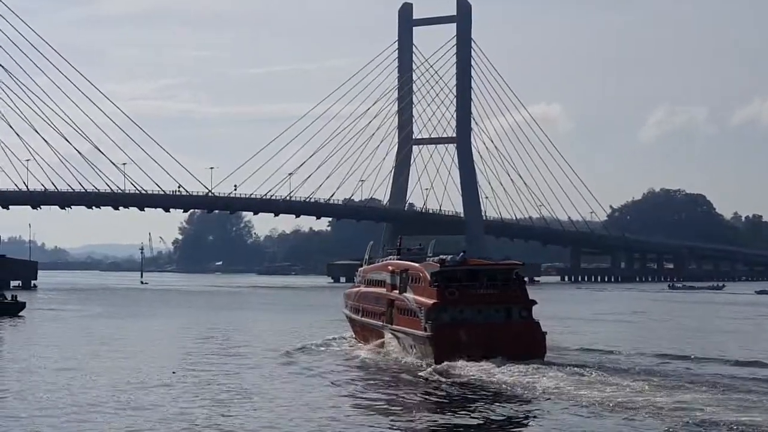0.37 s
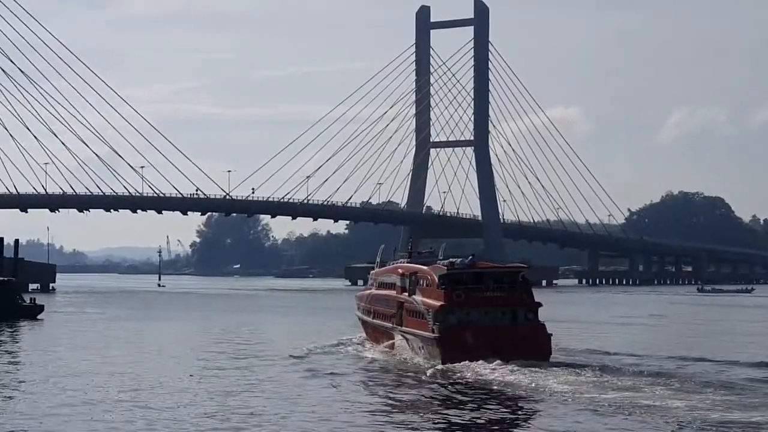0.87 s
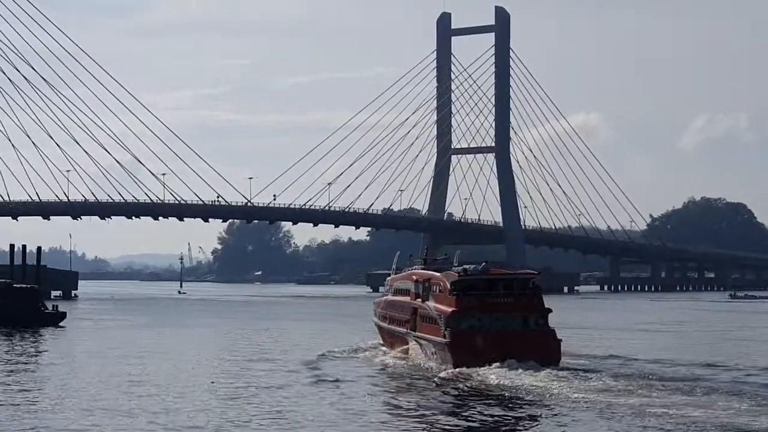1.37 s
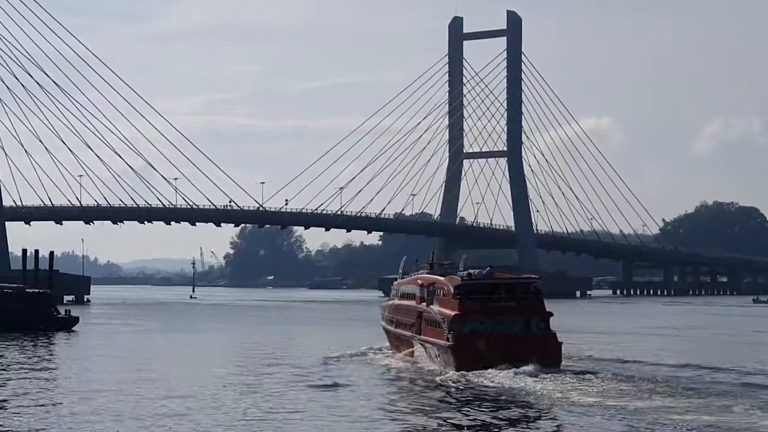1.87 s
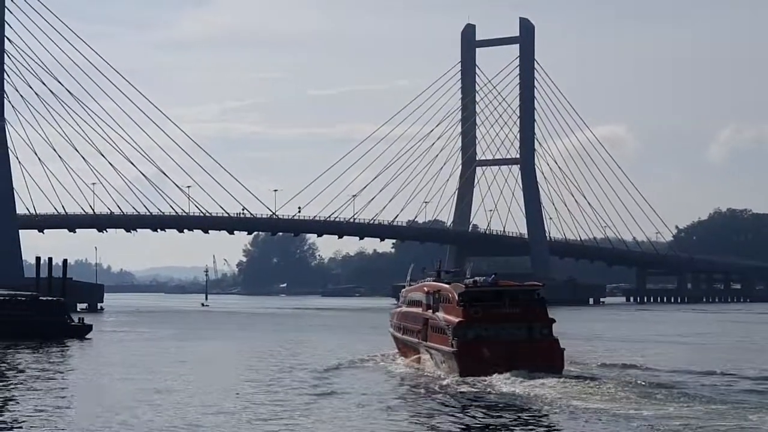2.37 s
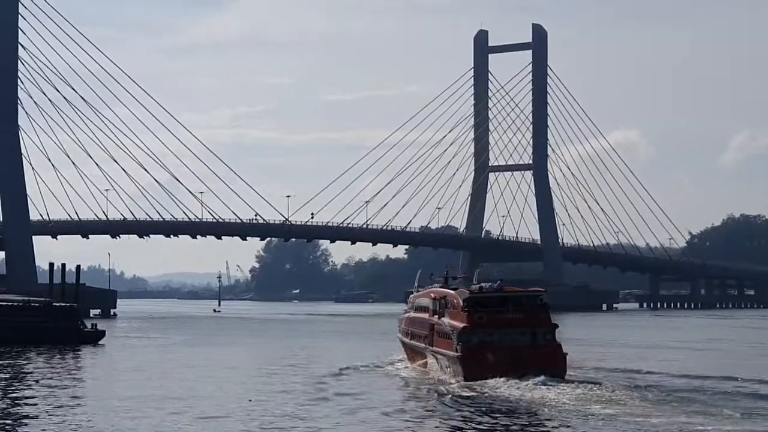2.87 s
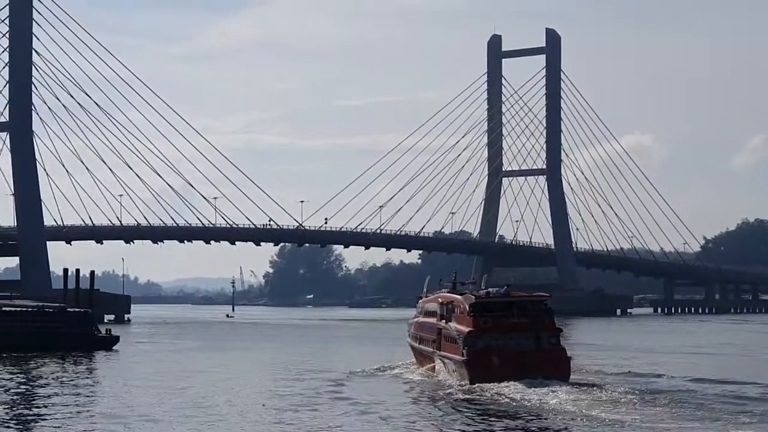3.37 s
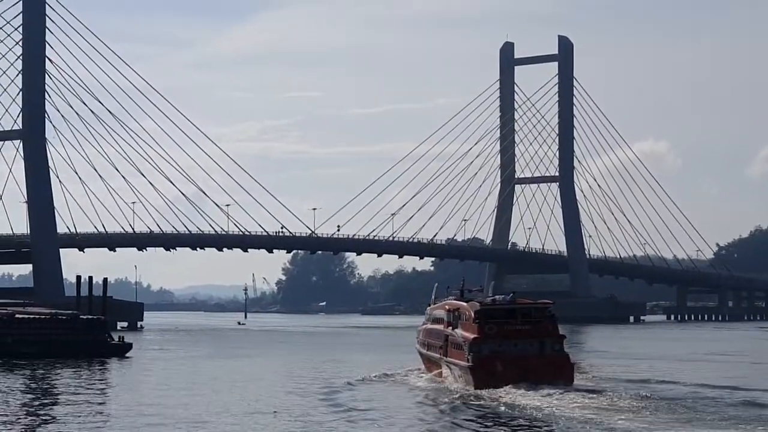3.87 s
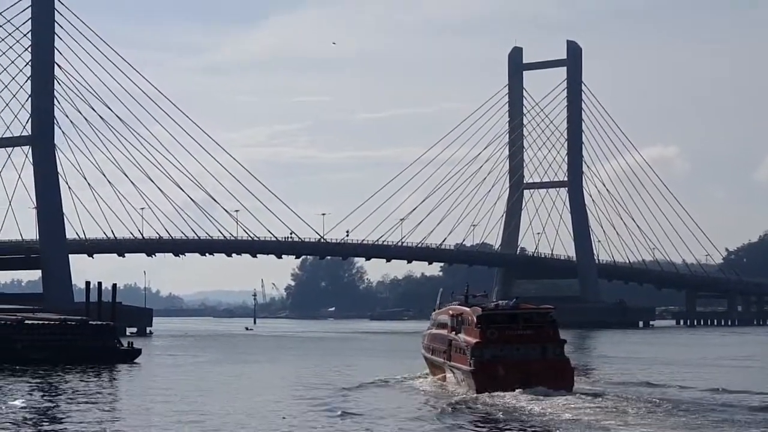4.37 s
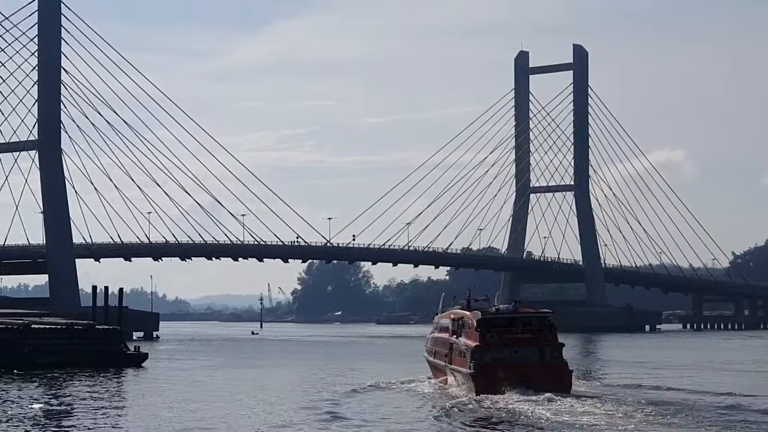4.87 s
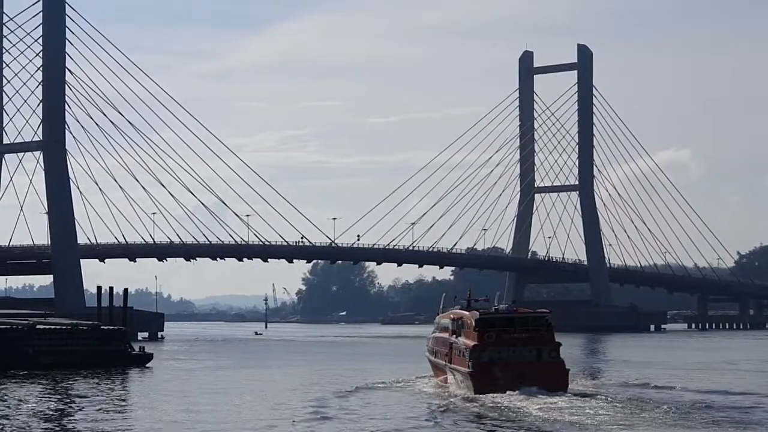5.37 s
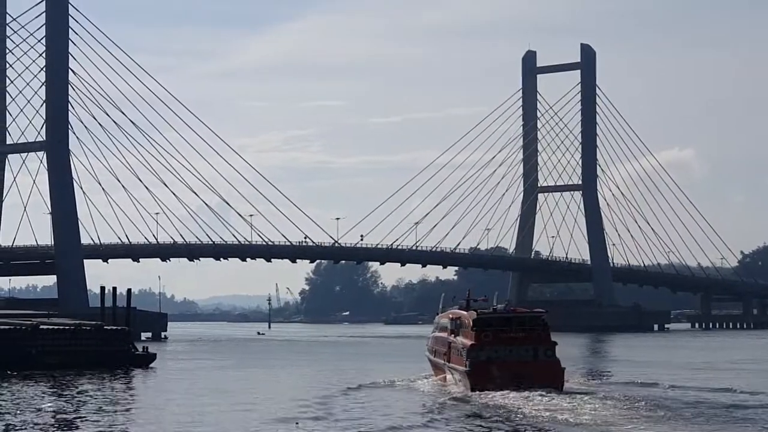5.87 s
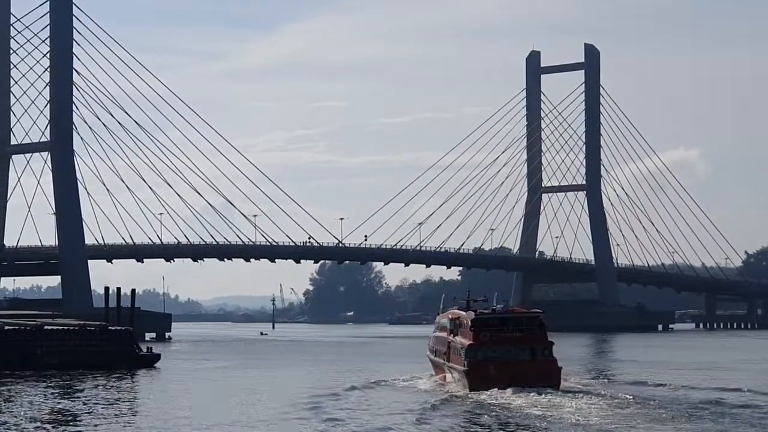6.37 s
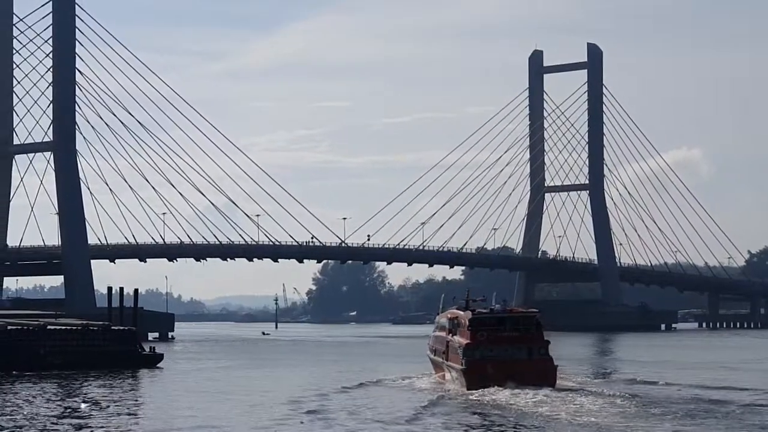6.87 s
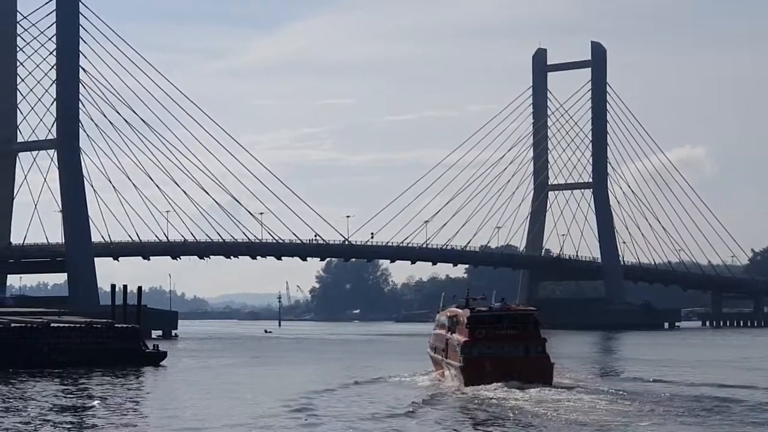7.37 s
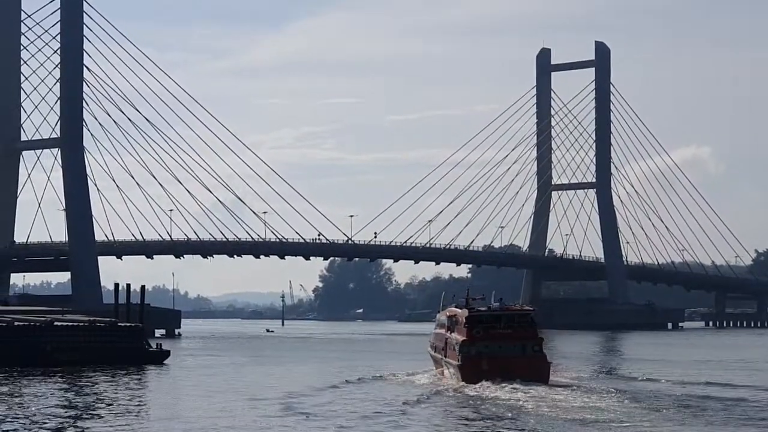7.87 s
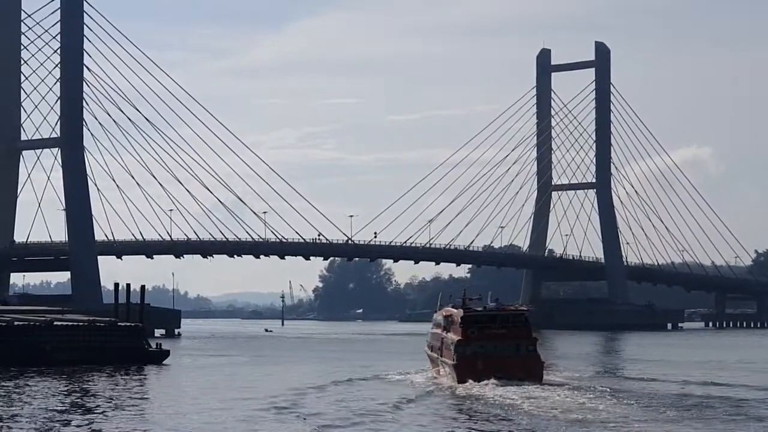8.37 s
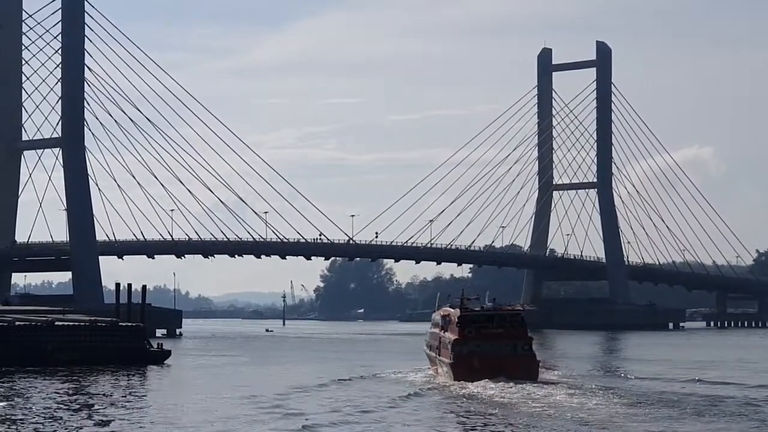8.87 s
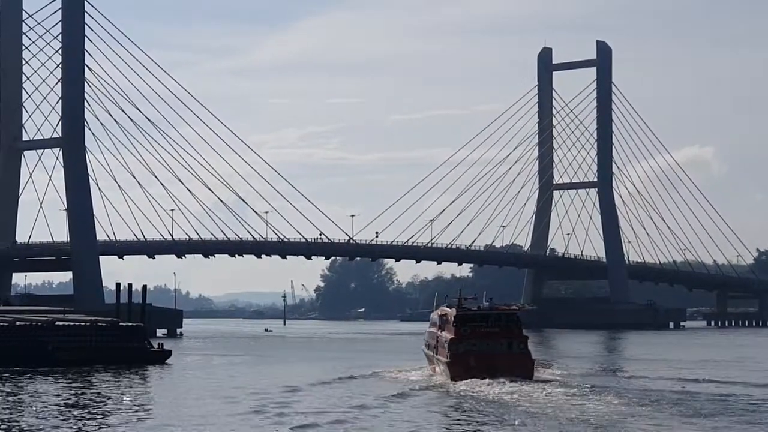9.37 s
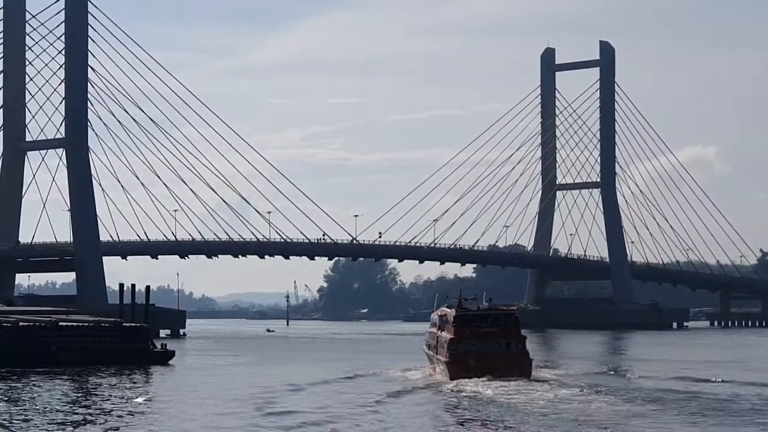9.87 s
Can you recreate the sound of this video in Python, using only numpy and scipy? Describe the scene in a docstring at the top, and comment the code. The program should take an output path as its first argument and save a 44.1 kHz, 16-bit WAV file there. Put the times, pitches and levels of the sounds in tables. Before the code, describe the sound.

On an open harbour waterfront, a large moored diesel drones steadily and deeply. A departing ferry adds low throbbing and churned wake at first, then fades after the middle. A small one-cylinder boat putt-putts rapidly throughout, its pops and cracks sharpening with the breeze. Water hisses and laps at the quay near a stereo microphone, with a dry tick and tiny scrape early on and more later.

```python
"""A harbour quay, ten seconds. A big moored diesel drones throughout as sums of tones on its engine cycle, with a
third engine further off, noise-rung casings, a lone deep hum and a faint whine. A ferry pulls away: its tones and
wake are strongest at first, then sink. All along a one-cylinder boat putt-putts: pulses thump through a pipe, and
breeze lifts their pops and cracks. Noise bands and ringing bubbles hiss and lap at the quay, with surges after 4.8 s.
Close by, filtered clicks tick and noise grains scrape near 2.5 s and 6.4 s."""
import sys
import numpy as np
from scipy import signal
from scipy.fft import rfft, irfft, next_fast_len
from scipy.io import wavfile
from scipy.ndimage import uniform_filter1d

SR = 44100
rng = np.random.default_rng(int(sys.argv[2]) if len(sys.argv) > 2 else 0)


def int16_out(signal):
    """Quantize to a 16-bit WAV file."""
    q = np.round(np.clip(np.atleast_2d(signal).T, -1, 1) * 32767)
    wavfile.write(sys.argv[1], SR, q.astype(np.int16))


def volts(x):
    """Linear amplitude factor 10**(x/20) for a level x in dB, scalar or array-like."""
    e = np.asarray(x, float) / 20
    return 10 ** e


N = 440559
T = np.arange(N) / SR
FAST = next_fast_len(N)
SILENCER_LAG = 2.1  # radians by which a silencer holds back the tones
HISS_DB = 2  # lift of hiss and foam in settled water


def curve(rows):
    """Columns of a time table, one value a sample."""
    s, *columns = np.transpose(rows)
    return [np.interp(T, s, c) for c in columns]


def on_log(hz, rows):
    """Value of a (Hz, value) table on a log-frequency axis."""
    f, v = np.transpose(rows)
    return np.interp(np.log(np.maximum(hz, 1)), np.log(f), v)


def unit(x):
    """Scale to rms 1."""
    return x / np.sqrt(np.mean(x ** 2))


def walk(rate):
    """Random levels held 1 / rate s and slewed twice; spread near 1."""
    hold = int(SR / rate)
    steps = np.repeat(rng.standard_normal(N // hold + 1), hold)
    return 4 / 3 * uniform_filter1d(uniform_filter1d(steps, hold), hold)[:N]


def colour(x, rows, size=1024):
    """Causal filter with the given (Hz, dB) gain, from the cepstrum."""
    cepstrum = irfft(np.log(volts(on_log(np.arange(size // 2 + 1) * SR / size, rows))))
    cepstrum[1:size // 2] *= 2
    cepstrum[size // 2 + 1:] = 0
    return signal.fftconvolve(x, irfft(np.exp(rfft(cepstrum))))[:N]


def band(x, hz, width):
    """Two-pole band-pass."""
    return signal.lfilter(*signal.iirpeak(min(hz, SR / 2.2), hz / width, fs=SR), x)


def steep_band(x, hz, width):
    """The band-pass twice over, for steeper skirts and a softer onset."""
    return band(band(x, hz, width), hz, width)


def bump(at, length):
    """Smooth swell around a moment."""
    return np.exp(-2 * ((T - at) / length) ** 2)


def ports(x, lag, pan_db):
    """Two microphone ports: the left hears it lag samples later and pan_db louder than the right."""
    late = np.interp(np.arange(N) - lag, np.arange(N), x)
    return np.array([late, x]) * volts(np.array([[pan_db], [-pan_db]]) / 2)


# waves of the wake breaking on the quay: start_s (the crest), length_s, lift_db
SURGES = [(4.854, 0.061, 2.5), (5.007, 0.058, 4.5), (6.393, .3, 3.5), (9.05, 0.037, 1.5)]


def churn():
    """How hard the water works, in dB: the fading wake plus each surge."""
    wake_db = 3 * bump(0, 1.33 * 2)  # extra churn close behind the ferry
    return wake_db + sum(db * bump(at, length) for at, length, db in SURGES)


# water and harbour wash in front, before the churn lifts it: pitch_hz, level_db (per Hz)
WASH = [(22, -74), (43, -59), (70, -54), (86, -46), (108, -62), (137, -65), (165, -58), (215, -64),
        (250, -60), (320, -67.5), (354, -65), (385, -73), (580, -71.5), (830, -81.5), (1700, -82.5),
        (3000, -88), (3500, -88.5), (4400, -92.5), (8000, -106), (9000, -106.5), (16000, -127)]
# width of the wash: pitch_hz, side_db (sides against the front)
WIDE = [(25, -13.5), (75, -15), (130, 5.5), (190, -19), (400, 1), (520, -9.5), (1100, 1.5), (8000, 0),
        (14000, -0.5)]


def wash():
    """Octave noise bands flicker alone, slosh together above the bass and follow the churn."""
    settled_gurgle_db, settled_spray_db = 4, 0.5
    gurgle_share, spray_share = 0.51, 0.55  # of the churn, against the hiss
    spray_pan_db = -3
    work_db = churn() + .6 * walk(6)
    slosh = walk(10)
    gurgle_db = settled_gurgle_db + gurgle_share * work_db + .9 * slosh
    hiss_db = HISS_DB + work_db + 1.1 * slosh
    spray_db = settled_spray_db + spray_share * churn()
    hz = np.fft.rfftfreq(FAST, 1 / SR)
    noise = rfft(rng.standard_normal((2, FAST)))
    mid, side = noise * volts(on_log(hz, WASH)) * np.sqrt(SR / 2)
    side = side * volts(on_log(hz, WIDE))
    pair = np.array([mid + side, mid - side])
    out = 0
    for step in range(10):
        # overlapping bands, an octave apart from 31.25 Hz
        share = np.clip(1 - np.abs(np.log2(hz / 31.25 + 1e-9) - step), 0, 1)
        if step < 4:
            churn_db = 0
        elif step < 6:
            churn_db = gurgle_db
        elif step < 8:
            churn_db = hiss_db
        else:
            churn_db = (step - 7) ** 2 * spray_db + .7 * slosh
        pan_db = spray_pan_db * (step > 7) * np.array([[.5], [-.5]])
        out = out + irfft(pair * share, FAST)[:, :N] * volts(churn_db + pan_db + 0.42 * walk(8.1))
    return out


# bursting foam, one row: lowest_hz, highest_hz, rate (bubbles a second at each size),
# level_db (rms before hiss lift, churn and flicker), fall_db (an octave)
FOAM = (899.5, 4400.5, 26.5, -56.5, 3.5)


def foam():
    """Scattered bubbles of eight sizes ring briefly, unrelated left and right, in patches that follow the churn."""
    lo_hz, hi_hz, rate, db, fall_db = FOAM
    out = 0
    for hz in np.geomspace(lo_hz, hi_hz, 8):
        where, size = rng.random((2, int(2 * rate * N / SR)))
        bursts = np.zeros(2 * N)  # left channel, then right
        bursts[(where * 2 * N).astype(int)] = volts(18.0 * size)
        ring = band(band(bursts.reshape(2, N), hz, hz / 12), hz, hz / 6)
        out = out + unit(ring) * volts(-fall_db * np.log2(hz / lo_hz))
    return unit(out) * volts(db + HISS_DB + churn() + 1.5 * walk(7))


# wavelets on the quay wall: start_s (mid-cluster), level_db (relative), pitch_hz (typical, at onset), length_s
LAPS = [(0.131, -46, 596, 0.12), (1.048, -44, 564, 0.076), (1.52, -40, 514, 0.071),
        (2.428, -39.5, 576, .14), (3.242, -40, 558, 0.13), (4.949, -40.5, 570, 0.11),
        (6.22, -40.5, 640, 0.089), (7.016, -38.5, 521, 0.07), (7.595, -42.5, 562, 0.096),
        (8.678, -43, 562, 0.059), (9.331, -39.5, 530, 0.12), (9.849, -39, 545, 0.062)]


def laps():
    """Each wavelet frees a cluster of short bubbles that rise in pitch."""
    out, t = np.zeros((2, N + 2000)), np.arange(2000) / SR
    for at, db, hz, length in LAPS:
        for when, pitch, size, side in rng.standard_normal((26, 4)):
            bubble_hz = hz * np.exp(.12 * pitch)
            i = int(np.clip(at + when * length / 2, 0, T[-1]) * SR)
            tone = np.sin(2 * np.pi * bubble_hz * t * (1 + 5 * t))
            bubble = tone * np.exp(-t / 0.0079) * np.minimum(t / 0.0041, 1)
            pan_db = 5.4 * side * np.array([[1], [-1]])
            out[:, i:i + 2000] += volts(db + 3.0 + 1.5 * size + pan_db) * bubble
    return out[:, :N]


# ticks close by: start_s, level_db (peak), pitch_hz, width_hz
TICKS = [(2.5975, -19.5, 1450, 1500), (2.597, -39, 8000, 6000), (6.428, -48, 11000, 5000),
         (6.4385, -33, 11500, 6000), (6.445, -50, 13000, 4000)]


def ticks():
    """Dry ticks: single clicks through a resonance."""
    out = np.zeros((2, N))
    for at, db, hz, width in TICKS:
        click = 1. * (np.arange(600) == 0)
        tick = steep_band(click, hz, width)
        i = int(at * SR)
        out[:, i:i + 600] += tick * volts(db) / np.abs(tick).max()
    return out


# short rasps: start_s (mid-swell), level_db (rms before grain and swell), pitch_hz, width_hz, length_s
RASPS = [(2.497, -47, 2830, 300, .016), (6.345, -41, 2350, 600, .04), (6.42, -46, 2300, 650, .05),
         (6.358, -52, 3950, 500, .025), (6.43, -53, 4000, 500, .025)]


def rasps():
    """Brief scrapes: narrow noise with fast random grain under a smooth swell."""
    out = np.zeros((2, N))
    for at, db, hz, width, length in RASPS:
        grain = unit(steep_band(rng.standard_normal(N), hz, width)) * volts(2.5 * walk(150))
        out += ports(grain * bump(at, length) * volts(db), 1.5, 0)
    return out


# engine casings ring on: pitch_hz, width_hz, level_db (rms before waver)
CASING = [(1050, 77, -55), (1660, 120, -59), (2150, 160, -70), (3370, 1200, -70)]


def casing():
    """Valve gear keeps a few broad casing resonances ringing, unevenly."""
    out = 0
    for hz, width, db in CASING:
        out = out + unit(band(rng.standard_normal(N), hz, width)) * volts(db + 2.0 * walk(5.9))
    return ports(out, 13.0, 0)


def diesel(hz, orders, start, waver_db):
    """Clean tones on multiples of the engine cycle; odd ones, from unequal banks, come a quarter period late."""
    turns = 2 * np.pi * (hz * T + start)
    out = 0
    for k, db in orders:
        random_phase = (8 < k < 22) * rng.uniform(0, 2 * np.pi)  # middle tones start at random phases
        lag = SILENCER_LAG + k % 2 * np.pi / 2 + random_phase
        out = out + np.sqrt(2) * volts(db + waver_db * walk(3.7)) * np.cos(k * turns - lag)
    return out


# a faint high whine: multiple (of 411.5 Hz), level_db (rms before waver)
WHINE = [(15, -86), (16, -84), (17, -90), (18, -89)]


def whine():
    """Faint high tones on neighbouring multiples of one rate, wavering separately."""
    return diesel(411.5, WHINE, 0, 1.5)


# a lone deep tone: multiple (of 37.4 Hz), level_db (rms before waver)
HUM = [(1, -45.5)]


def hum():
    """One deep, slightly wavering tone."""
    return diesel(37.4, HUM, 0, .7)


# engine further off: multiple (of the cycle), level_db (rms before waver and pan)
FAR = [(4, -47), (5, -36), (6, -39)]


def far_engine():
    """A third diesel's low tones, reaching the left port late."""
    return ports(diesel(15.72, FAR, 0.041, 1.0), 4.0, .6)


# ferry tones: multiple (of the cycle), level_db (relative to the ferry level curve, before waver)
FERRY = [(6, -1.5), (15, -11.5), (20, -14.5)]
# the ferry pulling away: start_s, level_db (rms reference before waver and pan)
FERRY_LEVEL = [(0, -28.5), (3, -29.5), (5.5, -32), (7, -40.5), (10, -40)]


def ferry():
    """The leaving ferry's diesel tones, sinking along its level curve."""
    tones = diesel(12.727, FERRY, 0.0795, 0.94)
    return ports(tones * volts(curve(FERRY_LEVEL)[0]), 0, -1.1)


# big moored diesel: multiple (of the cycle), level_db (rms before waver and pan)
MOORED = [(4, -45), (6, -22), (7, -27.7), (8, -30), (8.5, -51), (9, -48), (10, -51), (11, -44), (12, -38),
          (14, -45), (18, -49), (20, -53), (22, -44), (24, -41), (26, -44.5), (28, -42.5), (34, -52)]


def moored():
    """The big diesel's steady drone, a stack of tones on its engine cycle."""
    return ports(diesel(12.969, MOORED, 0, 0.68), 0, 1.66)


def firing_chance(cycle):
    """One random number a firing, held through its cycle."""
    return rng.standard_normal(cycle[-1] + 1)[cycle]


# the small boat's pipe: pitch_hz, gain_db (relative)
PUTT_PIPE = [(33, -38), (48, -21), (66, -11), (82, 2), (98, -11), (115, -13), (130, -19), (148, -8),
             (165, -11), (181, -6), (200, -14), (225, -19), (248, -12), (290, -28), (400, -40),
             (1500, -110)]
# the thump swells and sinks as the small boat rocks: start_s, level_db (rms reference before pan)
THUMP_LEVEL = [(0, -26.5), (.6, -28), (1.35, -29.5), (2.3, -32.5), (3.3, -29.5), (4.45, -26), (5.4, -27.5),
               (6.9, -26.5), (7.75, -25.5), (9.25, -26), (10, -27)]


def thump(turns):
    """Each firing is a pulse, slightly uneven, that rings the pipe's resonances."""
    cycle = np.floor(turns).astype(int)
    firings = np.diff(cycle, prepend=0) * volts(0.36 * firing_chance(cycle))
    pipe = volts(on_log(np.fft.rfftfreq(FAST, 1 / SR), PUTT_PIPE)) * np.exp(-1j * SILENCER_LAG)
    rung = irfft(rfft(firings, FAST) * pipe, FAST)[:N]
    return unit(rung) * volts(curve(THUMP_LEVEL)[0])


def favour(hz, best_hz):
    """1 at the favoured pitch, fading an octave or so away."""
    reach_octaves = .7
    return np.exp(-2 * (np.log2(hz / best_hz) / reach_octaves) ** 2)


# firings that bark louder than their neighbours: start_s, lift_db, pitch_hz (that barks most)
BARKS = [(.779, 4, 1500), (.961, 7, 1250), (1.145, 7, 4400), (3.901, 8, 650), (4.324, 4, 1900),
         (5.357, 3, 650), (5.662, 6, 800), (5.968, 7, 5700), (6.637, 5, 700), (6.880, 5, 1200),
         (7.125, 8, 2700), (7.185, 6, 1300), (7.487, 6, 5900)]


def bark_lifts(cycle):
    """Bark lift in dB and favoured pitch in Hz, held through each firing's cycle; plain firings have no lift."""
    barks = np.ones((cycle[-1] + 1, 2)) * [0, 1]
    for at, *bark in BARKS:
        barks[cycle[int(at * SR) + 300]] = bark
    return barks[cycle].T


# puffs of breeze that carry the gas noise over: start_s (mid-puff), length_s, pop_lift_db, crack_lift_db,
# pitch_hz (cracks carried best)
GUSTS = [(0.6, 1.5, 4, 12, 1300), (.8, 1.3, 0, 10, 4300), (4.3, .8, 6, 12, 1950), (4.9, .3, 0, 9, 5800),
         (5.55, 0.9, 11, 2, 1000), (6.1, .8, 0, 10, 5600), (7.0, 1.1, 8, 13, 1400), (7.25, .6, 0, 10, 4800),
         (8.2, 0.41, 4, 8, 1900), (9.9, 0.42, 6.5, 3, 1200)]
# tone of the pop: pitch_hz, gain_db (relative)
POP = [(300, -24), (480, 0), (700, 0), (1000, -7), (1500, -20), (2600, -44), (7000, -70)]


def pop(cycle, since, bark_db, bark_hz):
    """Escaping gas: a decaying push plus turbulence each firing, lifted by the breeze."""
    puff = since * np.exp(-since / .021) * volts(bark_db * favour(700, bark_hz))  # since in cycles
    rough_puff = puff * volts(1.0 * firing_chance(cycle)) * (2.5 + rng.standard_normal(N))
    lift_db = sum(db * bump(at, length) for at, length, db, *_ in GUSTS)
    return unit(colour(rough_puff, POP)) * volts(-52 + lift_db)


# rings in the crack: pitch_hz, width_hz, level_db (relative)
CRACK_RINGS = [(1150, 400, -2), (1600, 350, -7), (2000, 350, -9), (2700, 320, -11), (3400, 320, -13),
               (4400, 320, -14.5), (5200, 320, -17), (5850, 350, -18)]


def crack(cycle, bark_db, bark_hz):
    """One sharp gas front a firing excites each ring unequally; the breeze lifts its favoured pitches."""
    crack_db, ring_scatter_db = -57.5, 3.5  # still-air reference; firing-to-firing spread
    front = np.roll(np.diff(cycle, prepend=0), 40) * volts(firing_chance(cycle))
    out = 0
    for hz, width, ring_db in CRACK_RINGS:
        chance = firing_chance(cycle)
        # barking firings take their bark in place of the scatter
        strike_db = ring_scatter_db * chance * (bark_db == 0) + bark_db * favour(hz, bark_hz)
        strike = front * np.sign(chance) * volts(strike_db)
        lift_db = sum(db * bump(at, length) * favour(hz, best_hz) for at, length, _, db, best_hz in GUSTS)
        out = out + unit(steep_band(strike, hz, width)) * volts(crack_db + ring_db + lift_db)
    return out


def wall_echo(gas):
    """The gas noise again off a nearby wall, later and thinner."""
    echo_s, echo_db, echo_hz = .0122, -7, 1900
    return volts(echo_db) * np.roll(band(gas, echo_hz, echo_hz), int(echo_s * SR))


# small boat, its governor hunting slowly: start_s, rate_hz (firings a second)
PUTT_SPEED = [(0, 16.43), (1.008, 16.477), (2.008, 16.227), (4.578, 16.489), (5.985, 16.389),
              (7.942, 16.521), (9.51, 16.234), (10, 16.294)]


def putt():
    """One firing a cycle thumps through the pipe; a pop and a crack of gas ride on it and echo off a wall."""
    turns = np.cumsum(curve(PUTT_SPEED)[0]) / SR + 0.1657  # part of a cycle done at 0 s
    cycle, since = np.divmod(turns + .025, 1)  # the gas cycle runs just ahead of the thump
    cycle = cycle.astype(int)
    bark_db, bark_hz = bark_lifts(cycle)
    gas = pop(cycle, since, bark_db, bark_hz) + crack(cycle, bark_db, bark_hz)
    return ports(thump(turns), 2.3, -.8) + ports(gas + wall_echo(gas), 2.5, .3)


def scene():
    """Water, nearby ticks and scrapes, casings, whine and hum, three diesels and the small boat."""
    water = wash() + foam() + laps()
    close_by = ticks() + rasps()
    engines = casing() + whine() + hum() + far_engine() + ferry() + moored()
    return water + close_by + engines + putt()


def band_limit(x):
    """A steep low-pass at the top of the band."""
    return signal.sosfilt(signal.butter(12, 15710, fs=SR, output="sos"), x)


def record(dry):
    """Delivers the finished mix."""
    return band_limit(dry)


dry = scene()
out = record(dry)
int16_out(out)
```